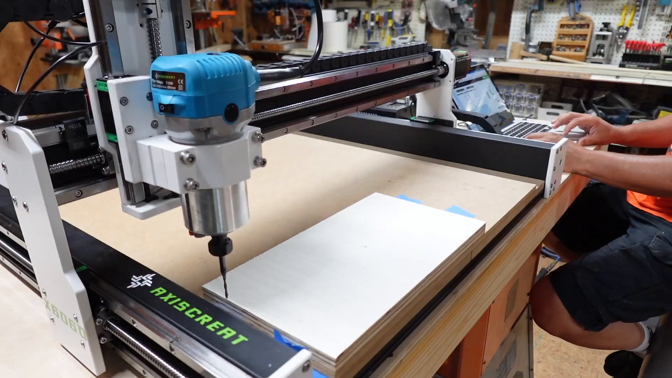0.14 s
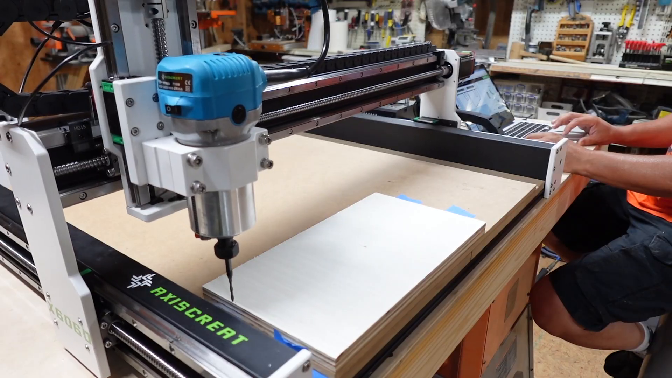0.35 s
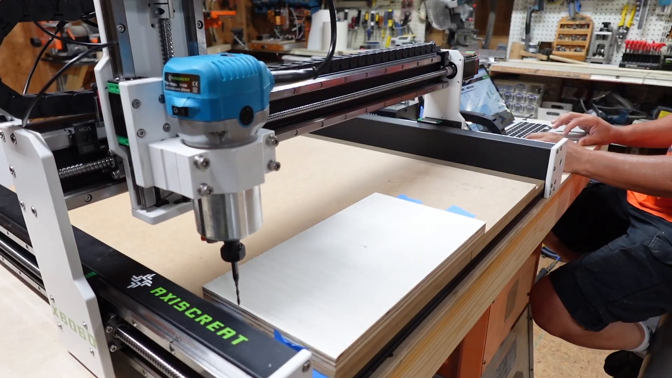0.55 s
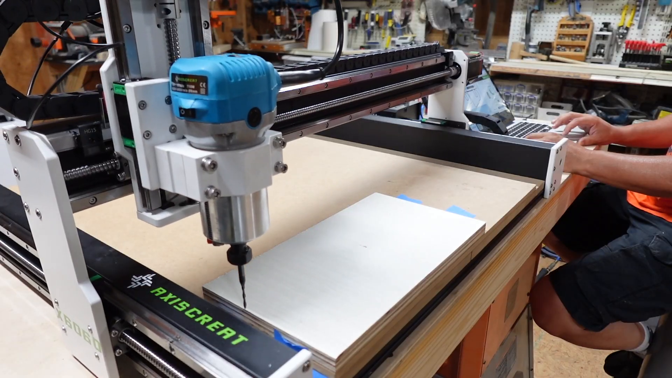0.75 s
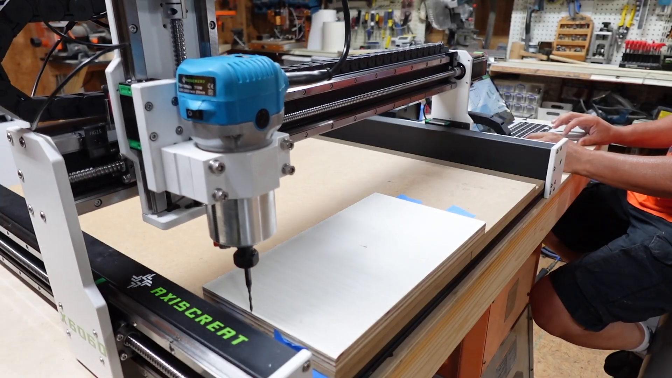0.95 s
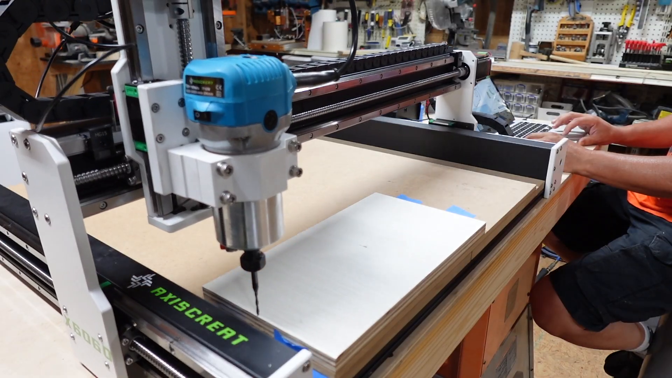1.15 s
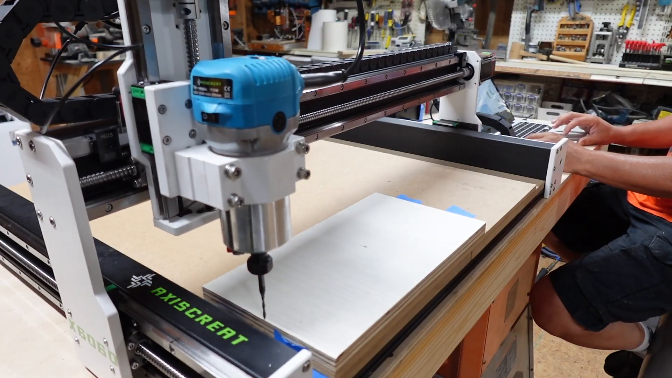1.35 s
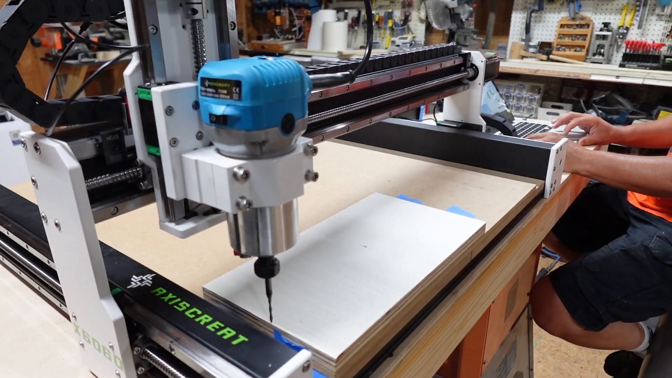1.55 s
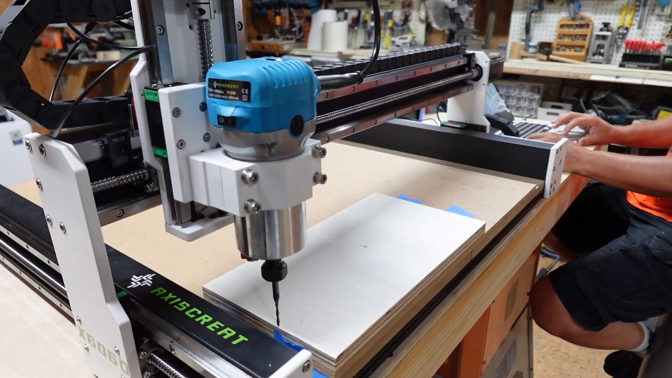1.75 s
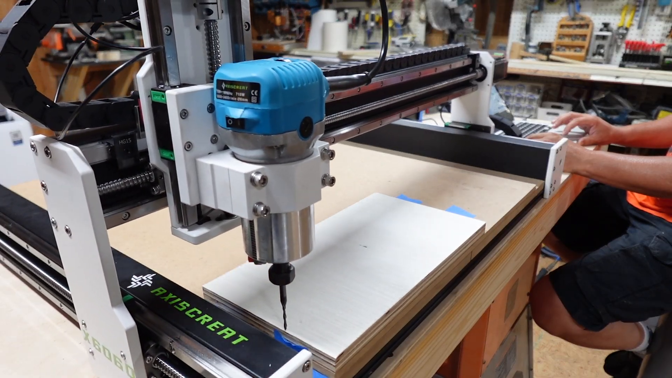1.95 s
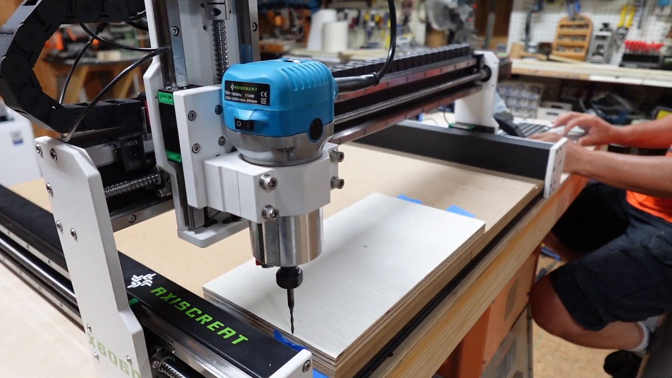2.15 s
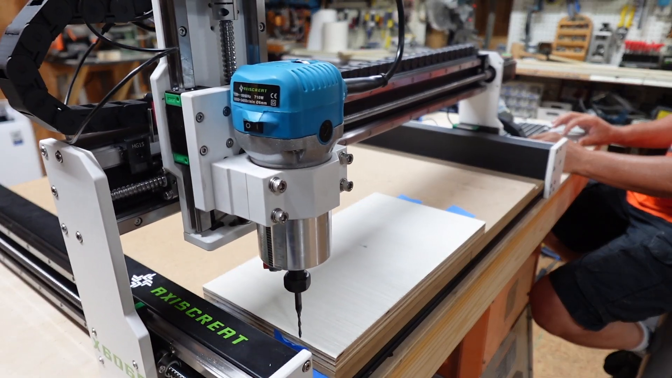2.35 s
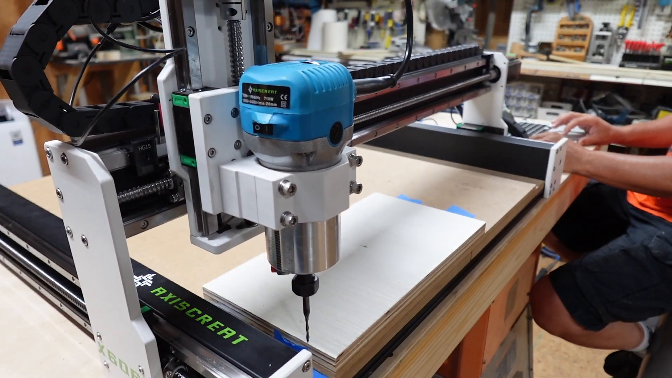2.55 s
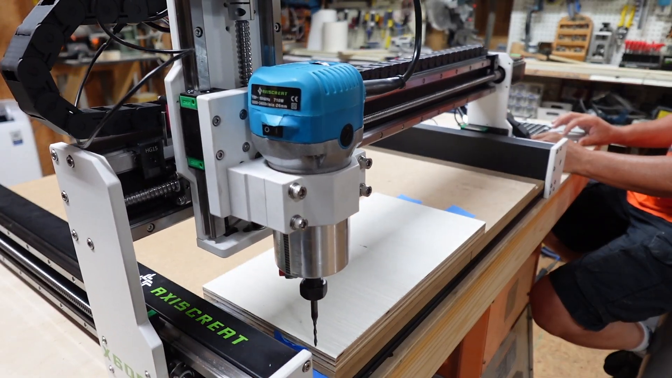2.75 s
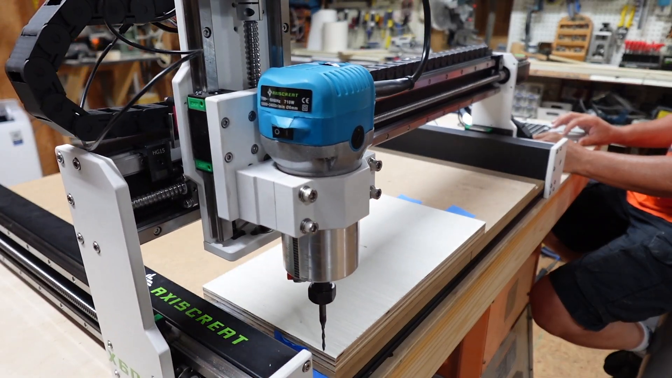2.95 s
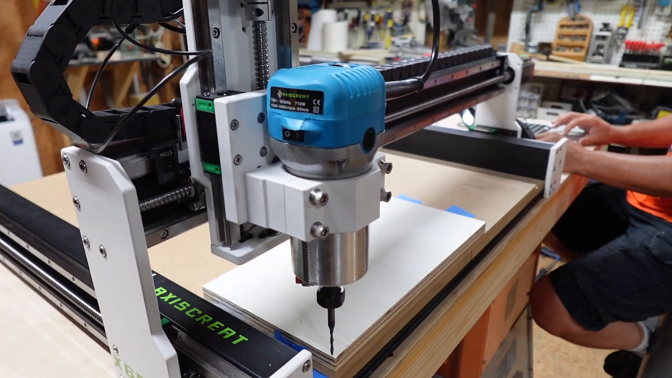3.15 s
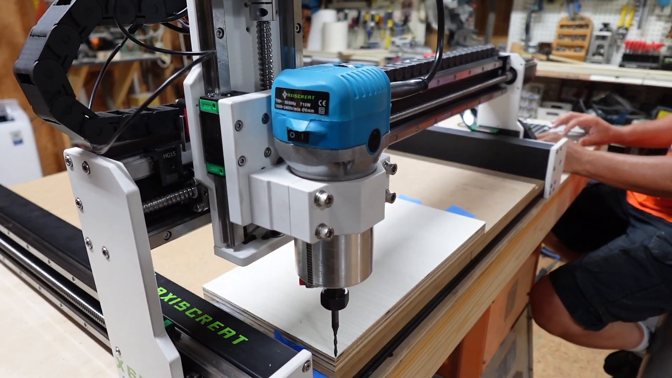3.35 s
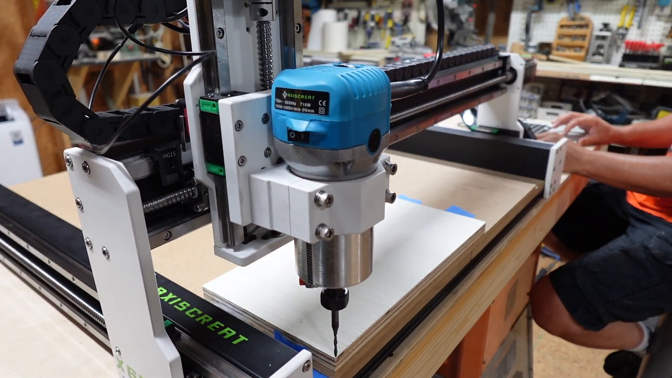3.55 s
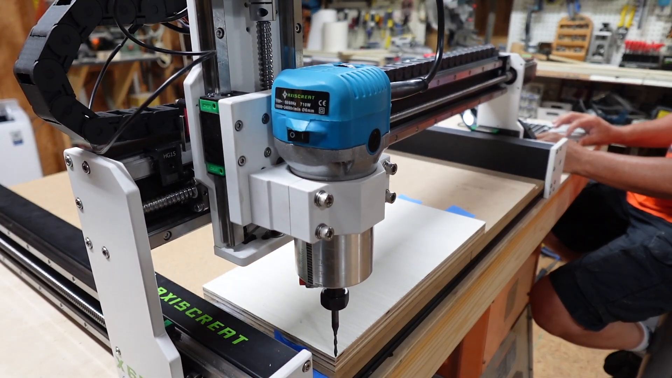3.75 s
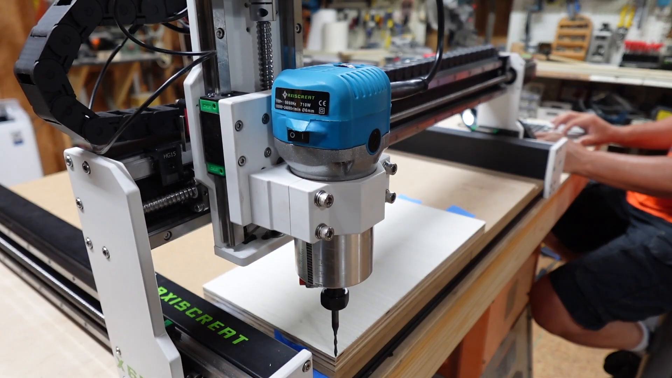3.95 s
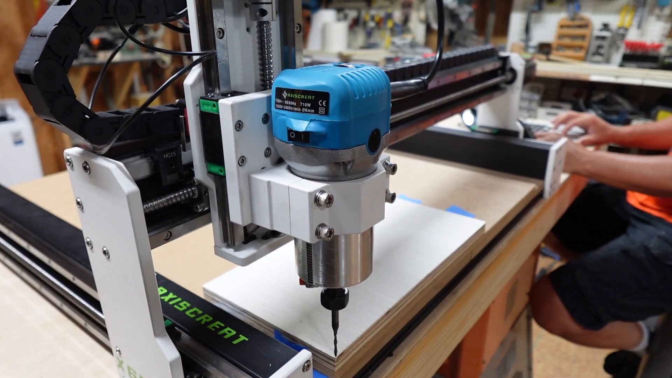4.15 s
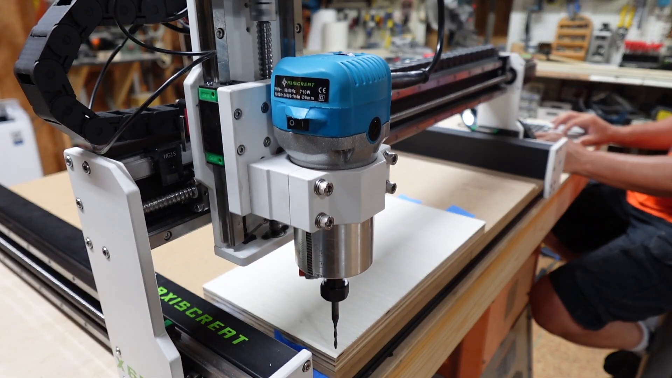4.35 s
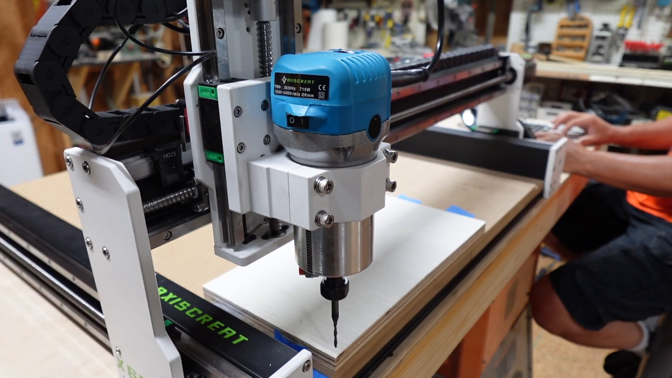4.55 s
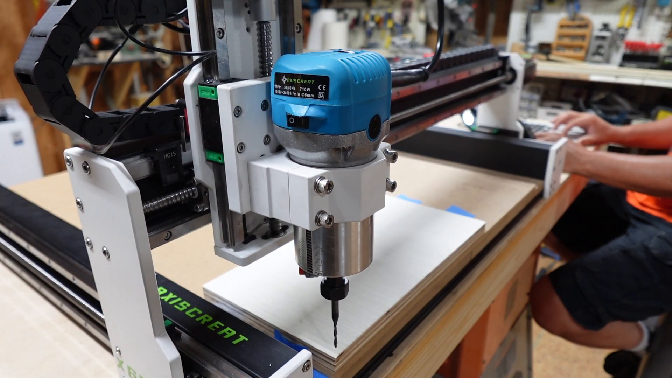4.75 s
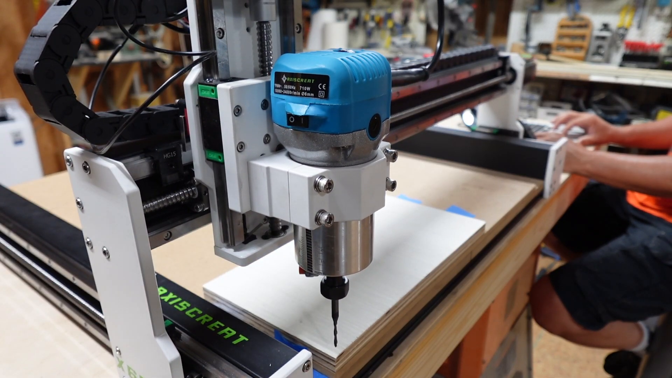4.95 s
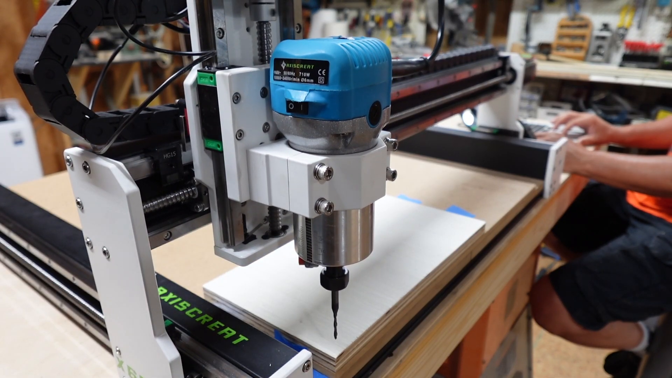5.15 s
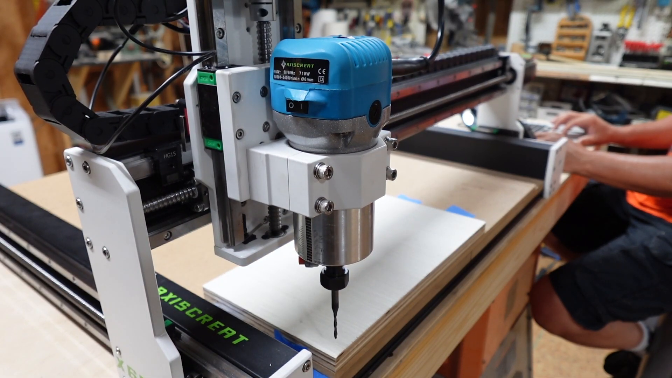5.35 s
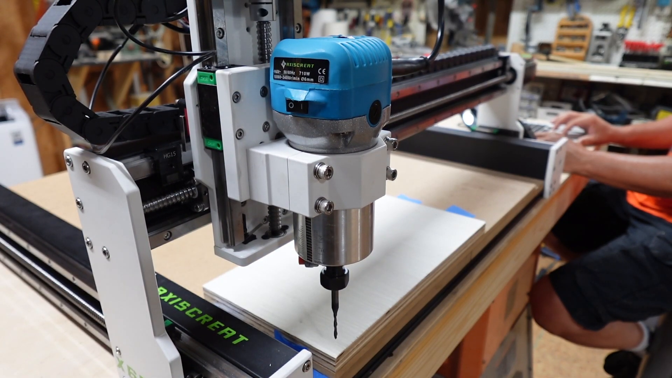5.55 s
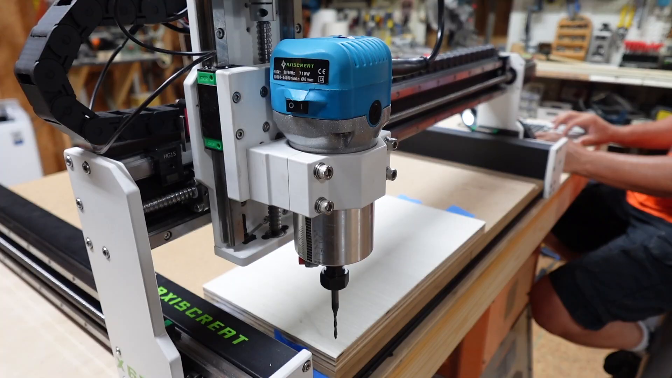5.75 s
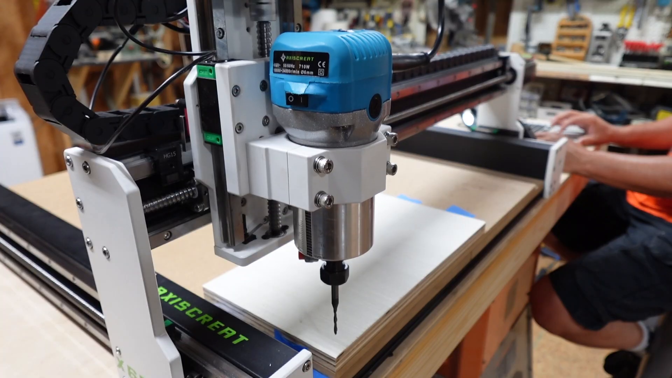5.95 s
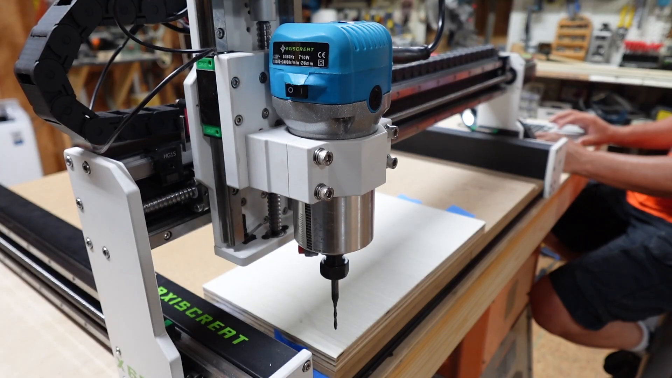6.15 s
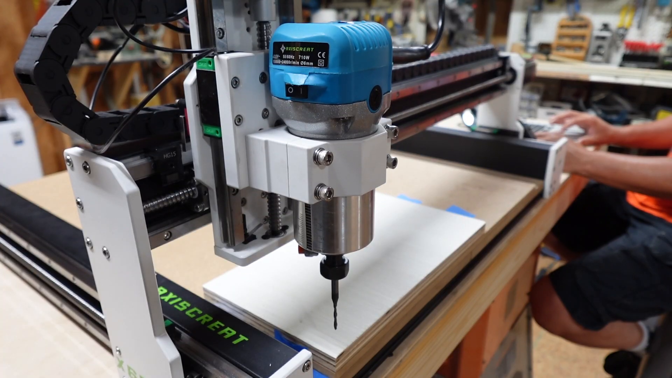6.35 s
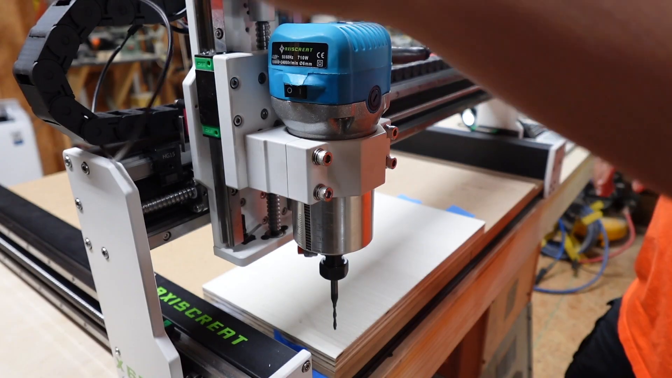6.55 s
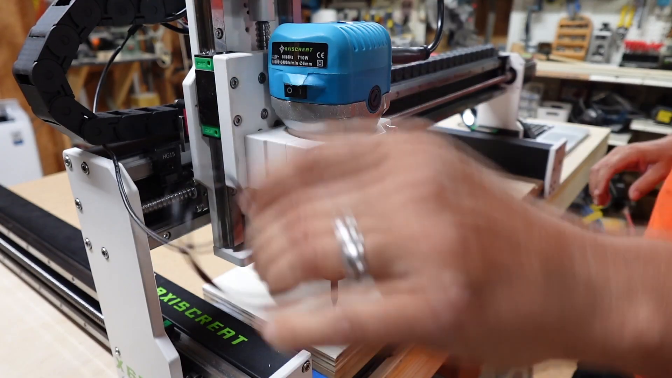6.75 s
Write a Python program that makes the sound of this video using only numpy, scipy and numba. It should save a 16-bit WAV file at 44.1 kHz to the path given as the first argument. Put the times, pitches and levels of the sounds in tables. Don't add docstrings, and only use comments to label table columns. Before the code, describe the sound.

In a small, fairly dry workshop, a stepper motor drives a router carriage in one long traverse: a low buzzing hum and a high piercing whine over rough bearing rumble. After about three seconds it slides down in pitch and stops with a dull thud. Then near silence, faint rustling, and three soft key clicks, each followed by a very quiet, short motor whir. Close microphone, slight room hiss.

```python
import sys
import numpy as np
from scipy import signal
from scipy.fft import rfft, irfft
from scipy.io import wavfile
from scipy.ndimage import uniform_filter1d
from numba import njit

SR = 44100
rng = np.random.default_rng(int(sys.argv[2]) if len(sys.argv) > 2 else 0)


def wav_out(sig):
    wavfile.write(sys.argv[1], SR, np.round(np.clip(np.atleast_2d(sig).T, -1, 1) * 32767).astype(np.int16))


N = 304290

# start in seconds, end in seconds.
CRUISE_S = [
    (-1, 3.301),
    (4.321, 4.443),
    (5.089, 5.21),
    (6.001, 6.128),
]
RAMP_S = .085
BRAKE_START_S = CRUISE_S[0][1]
HALT_S = BRAKE_START_S + 2 * RAMP_S
TURN_HZ = 12.1716
NODE_S = 2.01


def undb(db):
    return np.exp(np.asarray(db) * np.log(10) / 20)


def unit(x):
    return x / np.sqrt(np.mean(x ** 2))


def curves(rows):
    s, *columns = np.transpose(rows)
    return [np.interp(np.arange(N) / SR, s, c) for c in columns]


def spectrum_db(f, points):
    hz, db = np.transpose(points)
    return np.interp(np.log(f), np.log(hz), db)


@njit
def svf(x, hz, width):
    y, b, l = np.empty(len(x)), 0., 0.
    for i in range(len(x)):
        g, k = np.tan(np.pi * hz[i] / SR), width / hz[i]
        v = (b + g * (x[i] - l)) / (1 + g * (g + k))
        b, l, y[i] = 2 * v - b, l + 2 * g * v, k * v
    return y


def ring(x, hz, width_hz):
    return svf(x + 1e-18, hz + np.zeros(N), 1. * width_hz)


def walk(rate):
    k = int(SR / rate)
    levels = rng.standard_normal(N // k + 2)
    joined = np.interp(np.arange(N) / k, np.arange(N // k + 2), levels)
    return unit(uniform_filter1d(joined, k))


def motion():
    # step tone in dB, extra dB speeding up, extra dB braking.
    move_db = [
        (0, 0, -0.5),
        (-45.5, -10, 1.5),
        (-48, -4.5, 2.5),
        (-44.5, -7.5, 1.5),
    ]
    t, speed, ramp_db, jog_db = np.arange(N) / SR, np.zeros(N), np.zeros(N), np.zeros(N)
    for (start, end), (step_db, up_db, down_db) in zip(CRUISE_S, move_db):
        move = np.clip(1 + np.minimum(t - start, end - t) / RAMP_S, 0, 1)
        speed += move
        bend_s = [start - .01, start + .05, end - .03, end]
        ramp_db += (move > 0) * np.interp(t, bend_s, [up_db, 0, 0, down_db])
        jog_db += (move > 0) * step_db
    return speed, ramp_db, jog_db


def linger(x, order):
    # width in Hz, share of the tone.
    panel = (9.6, 0.19)
    width_hz, share = panel
    return (1 - share) * x + share * ring(x, order * TURN_HZ, width_hz)


def wobble_db(t):
    # level between nodes in dB, growth in dB/s.
    side_db = [
        (-34, 1.3),
        (-43.5, 5.5),
    ]
    # reference time in seconds, offset in seconds to its abrupt onset, level in dB, dB
    rattle = (1.56, -0.27, -41.5, -60)
    node_gap_s, node_fill = 2.15, .1
    wave = np.hypot(np.sin(np.pi * (t - NODE_S) / node_gap_s), node_fill)
    lines = [db + slope * (t - NODE_S) + 20 * np.log10(wave) for db, slope in side_db]
    s, rise_s, on_db, before_db = rattle
    lines.append(np.interp(t, [s - rise_s, s + rise_s], [before_db, on_db]))
    return lines


def motor(speed, ramp_db, jog_db):
    # time in seconds, pole tone in dB, step tone in dB.
    whine = [(0, -25.5, -34.5), (.3, -29.5, -34), (.55, -32.5, -32.5), (1.0, -24.5, -30.5),
             (1.5, -29.5, -29), (2.05, -30, -34), (2.42, -28.5, -25), (2.8, -28, -20.5),
             (3.3, -26.5, -18.5)]
    wobble = [
        (1, -.41, -.18),
        (-1, .17, -.03),
        (-2, -.05, -.02),
    ]
    # centre in Hz, width in Hz, level in dB.
    frame_modes = [(864, 30, 13), (1845, 35, 1), (2252, 53, -1)]
    # centre in Hz, width in Hz, level in dB.
    jog_modes = [(1320, 38, 12), (1020, 40, 6), (2262, 70, 8.5)]
    order_numbers = (95, 100, 101, 103, 145, 149, 150, 151, 152, 153, 192, 197, 202, 206, 250, 300, 350,
                     400, 550, 600, 601)
    # dB at the start, dB at the end of the traverse, dB in the jogs.
    order_db = [(-45, -45.5, -64), (-35, -42, -66), (-51, -48.5, -71), (-52.5, -46, -69), (-54, -53.5, -80),
                (-57, -55, -83), (-52, -42, -62), (-39.5, -47, -65), (-59, -58, -80), (-60, -58.5, -82),
                (-62.5, -54, -80), (-59, -52, -72), (-49.5, -51.5, -62), (-60, -60, -69), (-61, -74, -75),
                (-66.5, -73, -89.5), (-65, -77, -79), (-63.5, -64.5, -85), (-74, -75, -95), (-73, -69, -95),
                (-76.5, -82.5, -99)]
    throb = {151: -.8, 202: 2.1}
    # centre in Hz, wander in Hz, traverse in dB, jogs in dB.
    switching = (13399.5, 4.5, -68.5, -80)
    jog_pole_db = -61

    t = np.arange(N) / SR
    jog = t > HALT_S
    angle = 2 * np.pi * np.cumsum(speed) * TURN_HZ / SR
    pole_db, step_db = curves(whine)

    step = undb(np.where(jog, jog_db, step_db) + 0.54 * walk(25)) * np.sin(200 * angle)
    for (off, lag, slip), db in zip(wobble, wobble_db(t)):
        phase = 2 * np.pi * (lag + slip * np.tanh((t - NODE_S + .2) / .4))
        step += ~jog * undb(db + 2.5) * np.sin((200 + off) * angle + phase)
    rough_db = 4.5 * (speed < 1) * walk(110)
    step *= np.sqrt(2) * undb(ramp_db + rough_db - 1.9) * speed ** np.where(jog, 1.8, .7)

    frame = sum(undb(db) * ring(step * ~jog, hz, w) for hz, w, db in frame_modes)
    frame += sum(undb(db) * ring(step * jog, hz, w) for hz, w, db in jog_modes)

    pole_gain = undb(np.where(jog, jog_pole_db, pole_db) + 1.1 * walk(14))
    pole = np.sqrt(2) * speed ** 4 * pole_gain * np.sin(50 * angle)

    on, orders, sway = speed > 0, np.zeros(N), [walk(3) for _ in range(3)]
    for k, (order, (first_db, last_db, small_db)) in enumerate(zip(order_numbers, order_db)):
        traverse_db = first_db + (last_db - first_db) * t / HALT_S
        db = np.where(jog, small_db, traverse_db) + 1.7 * sway[k % 3]
        orders[on] += undb(db[on]) * np.sin(order * angle[on] + throb.get(order, 0))
    orders *= np.sqrt(2) * speed ** 4

    hz, wander_hz, far_db, near_db = switching
    chopper = np.sqrt(2) * np.sin(2 * np.pi * np.cumsum(hz + wander_hz * walk(12)) / SR)
    chopper *= undb(np.where(jog, near_db, far_db) + 1.1 * walk(8))
    chopper *= uniform_filter1d(np.where(jog, speed, on), size=4000, origin=1500)
    return linger(step, order=200) + linger(pole, order=50) + frame + orders + chopper


def room(x):
    t60_s, level_db = 0.11, -10
    t = np.arange(SR // 2) / SR
    tail = rng.standard_normal(len(t)) * 1000. ** (-t / t60_s) * (t > .004)
    tail = signal.lfilter([1], [1, -.5], tail)
    return signal.fftconvolve(x, tail / np.sqrt(np.sum(tail ** 2)))[:N] * undb(level_db)


def screw(speed):
    # Hz at start, turning time in
    # seconds, Hz there, Hz at halt.
    slide = [(112.9, 2.3, 76, 75), (312, 2.3, 235, 250), (428, 1.5, 490, 415), (960, 2.4, 1170, 957),
             (4740, 1.5, 4700, 4750), (8580, 1.5, 7200, 7600), (10500, 1.6, 8900, 10700)]
    # width in Hz, dB at start, dB at the turn, dB at halt.
    slide_db = [(6, -54, -52.5, -44.5), (9, -38, -40, -46), (34, -34.5, -39, -44), (44, -37, -34.5, -40),
                (500, -56.5, -59, -57), (898, -62.5, -64, -64), (700, -71, -64, -69)]
    # centre in Hz, width in Hz, level in dB.
    gantry = [(858, 20, -39.5), (742, 30, -43)]
    whirl_db = (6.5, 1)

    t = np.arange(N) / SR
    on = speed * (t < HALT_S)
    modes = []
    for (first_hz, s, turn_hz, last_hz), (w, *levels_db) in zip(slide, slide_db):
        bend_s = [0, s, BRAKE_START_S]
        hz = np.interp(t, bend_s, [first_hz, turn_hz, last_hz])
        modes.append((hz, w, np.interp(t, bend_s, levels_db)))
    modes += gantry

    shaken = np.zeros(N)
    for hz, w, db in modes:
        impacts = unit(ring(rng.standard_normal(N), hz, 1.34 * w))
        shaken += ring(on * undb(db + 1.77) * impacts, hz, 1.2 * w)
    whirl = sum(undb(db + extra_db) * np.sin(2 * np.pi * np.cumsum(hz) / SR)
                for (hz, _, db), extra_db in zip(modes, whirl_db))
    return shaken + on * whirl


def rumble_db(speed):
    # dB at 140, 430, 1300 and 4500 Hz.
    roll_start_db = (-42.5, -32.5, -32, -45)
    roll_fade_db = (-1, -1, -1.5, -2)
    jog_roll_db = (-57, -49, -55, -61)
    jog_brake_db = (-58, -46, -51.5, -65.5)
    stop_db = (-43, -42, -47.5, -55.5)
    settle_db = (-57.5, -56, -59.5, -65)
    rustle_db = (1.5, 3.5, -1, -5)
    roll_power = (2.5, 1.8, 1.9, 1.15)
    # extra rolling in dB, extra braking in dB.
    jog_extra_db = [
        (1, -1),
        (0, -1),
        (0.97, 2),
    ]
    # seconds after braking begins, half width in seconds, level in dB.
    coast = (0.1, 0.064, -14.5)
    # start in seconds, end in seconds, dB, bass tilt in dB.
    rustle = [(4.0, 4.14, -66.5, 0.5), (4.139, 4.23, -63.5, 1.5), (4.52, 4.602, -67.5, 5.5),
              (4.699, 4.822, -67.5, -1), (4.819, 5.034, -70, 0.5), (5.361, 5.827, -71, 0),
              (5.861, 5.942, -71, -0.5), (6.245, 6.5, -71, 1)]
    roll_lag_s, stop_s, settle_db_per_s = .03, 3.385, 36
    brake_lag_s, brake_half_s = .035, .036
    rustle_edge_s, quiet_db = .04, -80.5

    hop = 64
    t = np.arange(0, N, hop) / SR

    def col(db):
        return undb(np.array(db)[:, None]) ** 2

    def bump(s, half_s):
        return np.exp(-((t - s) / half_s) ** 2)

    keep = np.exp(-hop / SR / roll_lag_s)
    lagged = signal.lfilter([1 - keep], [1, -keep], speed[::hop], zi=[keep])[0]
    roll = lagged ** np.array(roll_power)[:, None]
    fade = col(roll_fade_db) ** (t / HALT_S)
    power = col(roll_start_db) * fade * roll ** 1.6 * (t < HALT_S + RAMP_S)
    power += col(stop_db) * bump(stop_s, .015) + undb(quiet_db) ** 2

    still = np.clip(t - HALT_S, -.1, 1)
    decay = undb(-settle_db_per_s * still * (1 + (still / 0.29) ** 2)) ** 2
    power += col(settle_db) * (t > stop_s) * decay

    coast_lag_s, coast_half_s, coast_db = coast
    for (start, end), (roll_db, brake_db) in zip(CRUISE_S[1:], jog_extra_db):
        near = np.abs(t - (start + end) / 2) < .3
        shiver = undb(coast_db) ** 2 * bump(end + coast_lag_s, coast_half_s)
        power += col(jog_roll_db) * undb(roll_db) ** 2 * (roll * near + shiver)
        power += col(jog_brake_db) * undb(brake_db) ** 2 * bump(end + brake_lag_s, brake_half_s)

    for start, end, db, tilt_db in rustle:
        edge = np.clip(np.minimum(t - start, end - t) / rustle_edge_s + .5, 0, 1) ** 2
        power += col(rustle_db) * col(db + tilt_db * np.arange(1, -1.1, -2 / 3)) * edge
    return [np.interp(np.arange(N), t * SR, 10 * np.log10(p)) for p in power]


def rumble(speed):
    # centre in Hz, width in Hz, dB over the rumble.
    body_modes = [(245, 25, 5), (430, 50, 4), (545, 30, 3), (1332, 24, 9), (1420, 40, 3), (2360, 40, 5),
                  (2520, 70, 6), (4900, 700, -5), (12700, 600, 0)]
    band_hz = (140, 430, 1300, 4500)
    # frequency in Hz, dB a third octave.
    colour = [(25, -34.5), (45, -22.5), (70, -14.5), (140, -8), (250, -10.5), (430, -9), (750, -7),
              (1000, -5.5), (1500, -7), (2000, -6), (2500, -9.5), (3200, -9.5), (5000, -8), (6300, -14.5),
              (9000, -13), (15000, -26)]
    # centre in Hz, width in Hz, share.
    jog_dip = (735, 260, 0.5)

    levels = rumble_db(speed)
    f = np.fft.rfftfreq(N, 1 / SR) + 1e-3
    body = 1 + sum(undb(db) ** 2 / (1 + (2 * (f - hz) / w) ** 2) for hz, w, db in body_modes)
    density = np.sqrt(body * SR / 2 / (.23 * f))
    noise = rfft(rng.standard_normal(N)) * undb(spectrum_db(f, colour)) * density
    grain_db = (.7 + 1.6 * (1 - speed)) * walk(250)
    out = 0
    for hz in 35 * 2. ** np.arange(10):
        place = np.interp(np.log(hz), np.log(band_hz), range(4))
        low = min(int(place), 2)
        db = levels[low] + (place - low) * (levels[low + 1] - levels[low])
        db -= 3.0 * (1 - speed) * (hz > 6000)
        db = db + grain_db * min(1, hz / 500, 2500 / hz) + 1.1 * walk(9)
        share = np.cos(np.pi / 2 * np.clip(np.log2(f / hz), -1, 1)) ** 2
        out = out + irfft(noise * share, N) * undb(db)
    hz, width_hz, share = jog_dip
    return out - share * (np.arange(N) / SR > HALT_S) * ring(out, hz, width_hz)


def floor():
    # frequency in Hz, spectral level in dB.
    hiss_colour = [(15, -34), (25, -0.5), (56, -2), (178, -7.5), (227, -10), (289, -13), (399, -15),
                   (1020, -18), (1140, -24.5), (15500, -31)]
    level_db = -64.5
    f = np.fft.rfftfreq(N, 1 / SR) + 1
    noise = rfft(rng.standard_normal(N)) * undb(spectrum_db(f, hiss_colour))
    return unit(irfft(noise, N)) * undb(level_db)


def keys():
    # time in seconds, peak in dB.
    presses = [
        (4.071, -41.5),
        (4.805, -41),
        (5.659, -39),
    ]
    # frequency in Hz, level in dB, t60 in seconds.
    plastic_modes = [(880, 2.5, 0.0078), (1446, -4, 0.014), (1925, 2.5, 0.007), (2400, -5, 0.013),
                     (3460, -7, .009), (6500, -15.5, .005)]
    # t60 in seconds, level in dB, centre in Hz.
    crack = (.003, -7.5, 2000)

    out, t = np.zeros(N), np.arange(2000) / SR
    crack_t60, crack_db, crack_hz = crack
    chance = rng.standard_normal((len(presses), len(plastic_modes)))
    for (s, peak_db), row in zip(presses, chance):
        click = np.zeros(len(t))
        for (hz, db, t60), c in zip(plastic_modes, row):
            tone = np.sin(2 * np.pi * hz * (1 + 0.039 * c) * t)
            click += undb(db + 1.5 * c) * tone * 1000. ** (-t / t60)
        contact = svf(rng.standard_normal(len(t)), crack_hz + 0 * t, 2. * crack_hz)
        click += undb(crack_db + 10) * 1000. ** (-t / crack_t60) * contact
        click *= 1 - np.exp(-t / 0.00042)
        i = int(s * SR)
        out[i:i + len(t)] += click / np.abs(click).max() * undb(peak_db)
    return out


def scene():
    speed, ramp_db, jog_db = motion()
    near = motor(speed, ramp_db, jog_db)
    click = keys()
    reverberant = room(undb(-3.5) * near + click)
    return (near + click + reverberant + screw(speed) + rumble(speed) + floor())[None]


def band_gaps(dry):
    # start in seconds, end in seconds of a gap.
    gaps_s = [(2.425, 2.445), (2.57, 2.71), (2.77, 2.84), (2.9, 3.15)]
    edges_hz = (2620, 2950, 3300, 3750)
    t, f, spectrum = np.arange(N) / SR, np.fft.rfftfreq(N, 1 / SR), rfft(dry)
    inside = np.max([np.minimum(t - start, end - t) for start, end in gaps_s], axis=0)
    out = dry
    for low_hz, top_hz in zip(edges_hz, edges_hz[1:]):
        ragged_s = (low_hz - 2400) * (4e-5 * walk(25) - 3e-5)
        gate = np.clip((inside + ragged_s + .012) / .008 + .5, 0, 1)
        out = out - gate * irfft(spectrum * ((f > low_hz) & (f <= top_hz)), N)
    return out


def roll_off(x):
    return signal.sosfilt(signal.butter(12, 15640, fs=SR, output="sos"), x)


def record(dry):
    mix = band_gaps(dry)
    return roll_off(mix)


dry = scene()
out = record(dry)
wav_out(out)
```